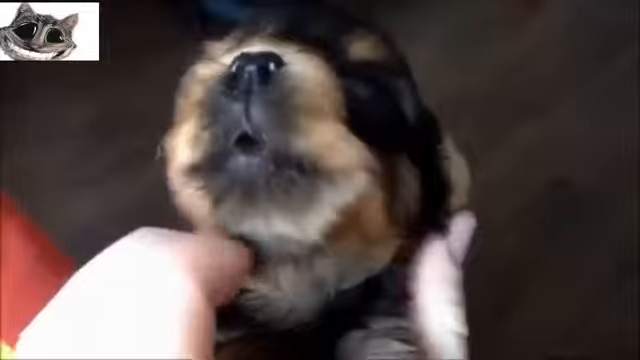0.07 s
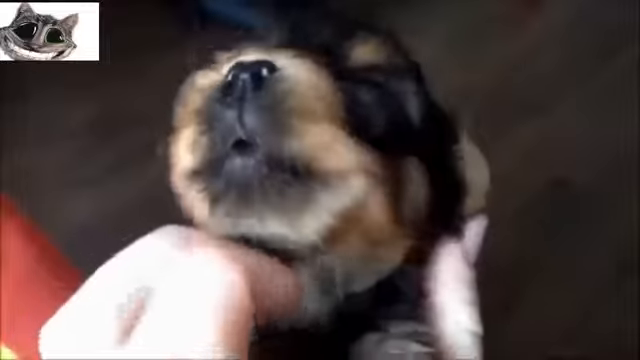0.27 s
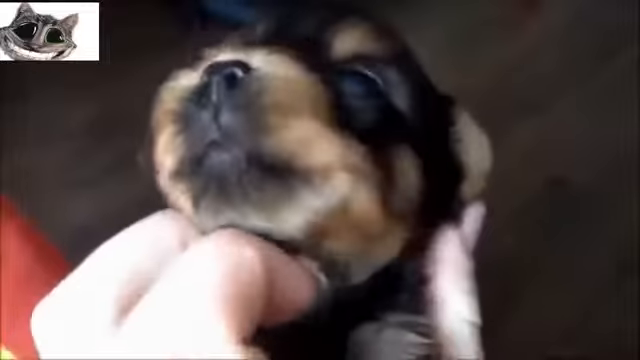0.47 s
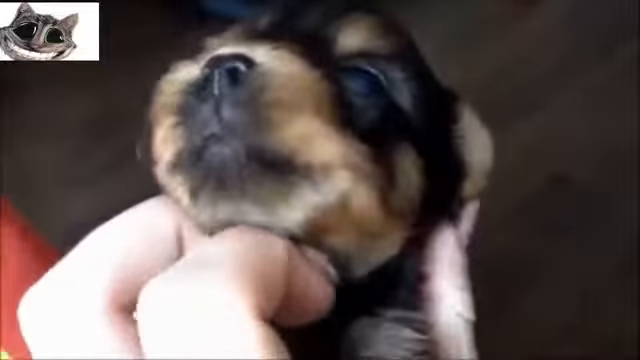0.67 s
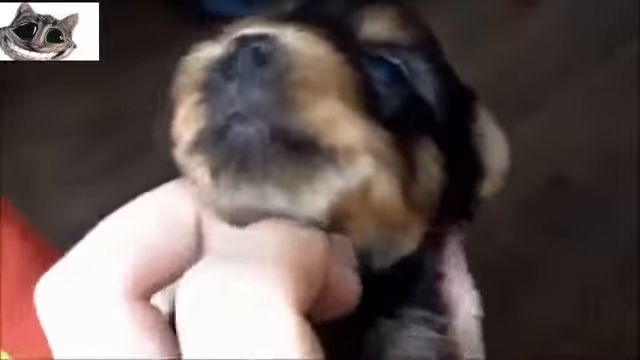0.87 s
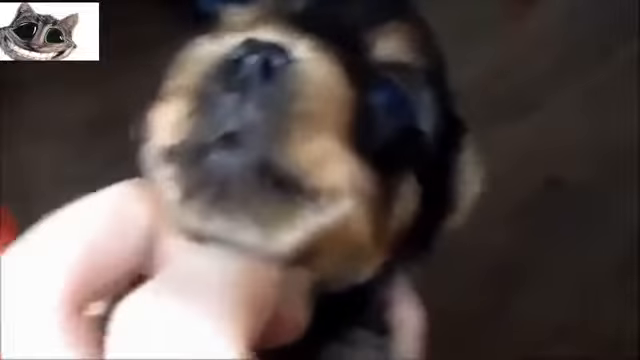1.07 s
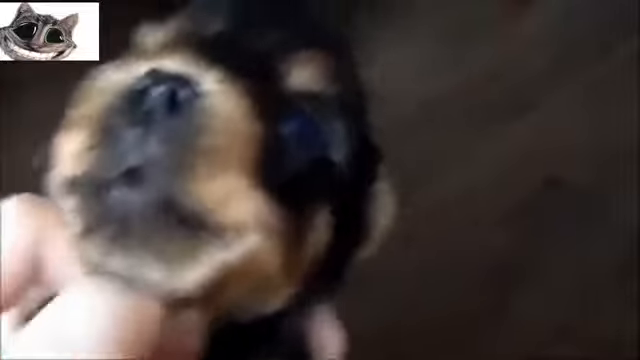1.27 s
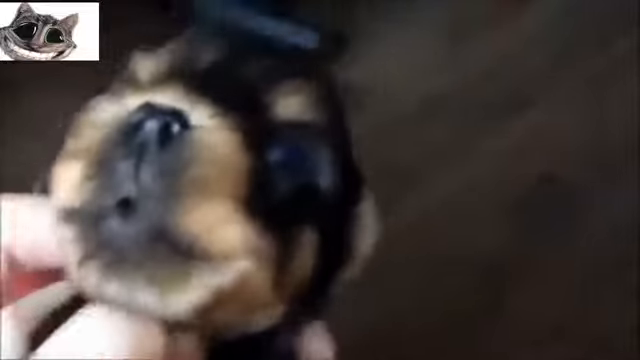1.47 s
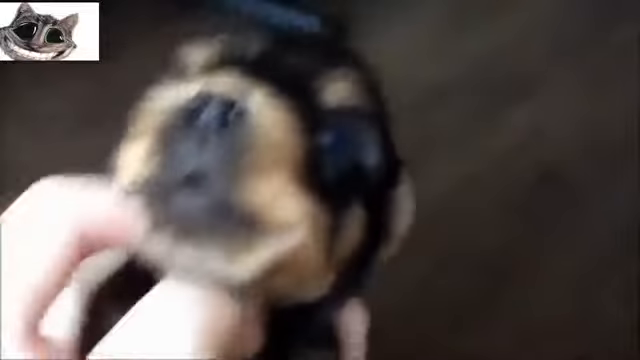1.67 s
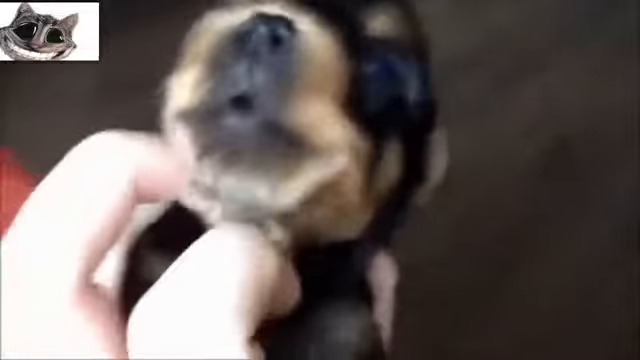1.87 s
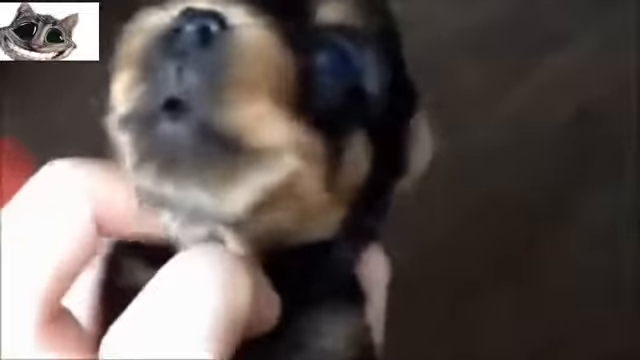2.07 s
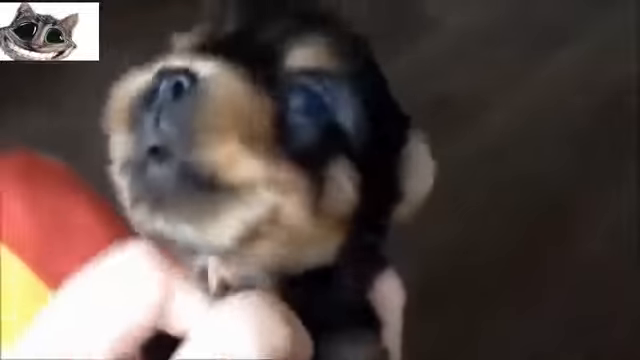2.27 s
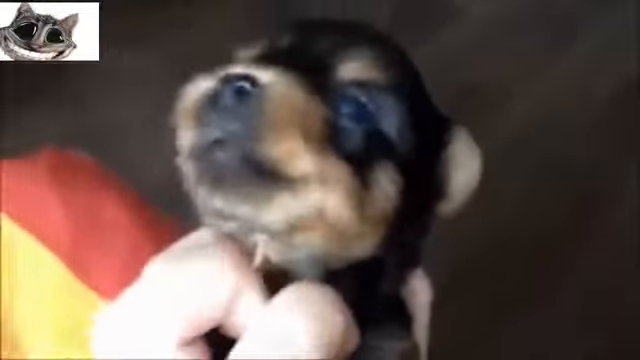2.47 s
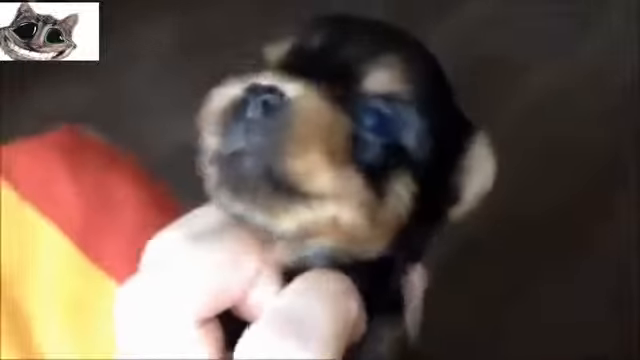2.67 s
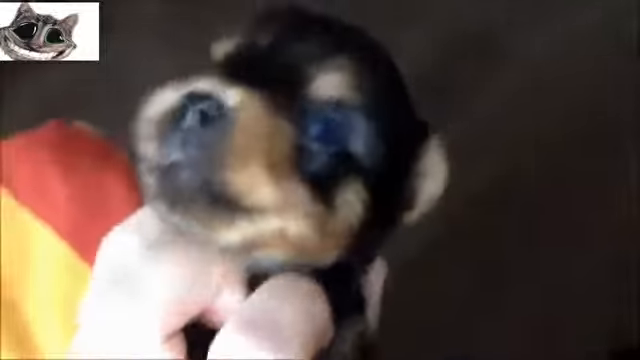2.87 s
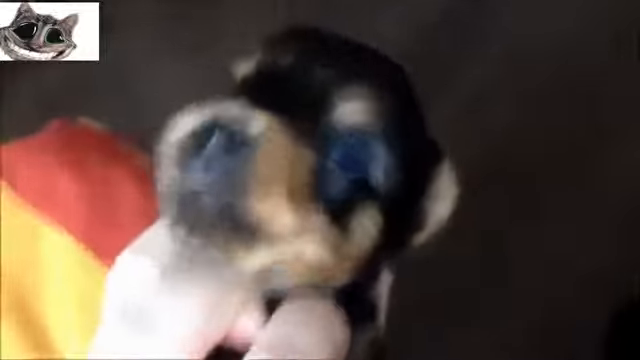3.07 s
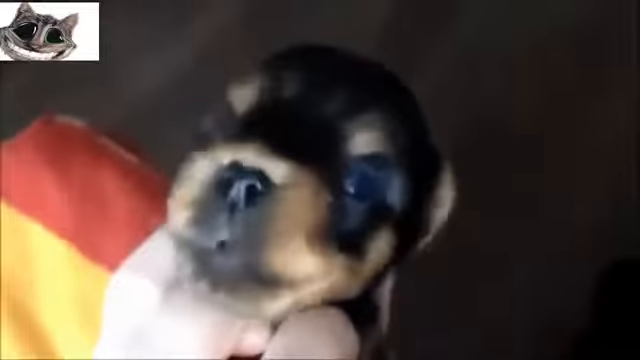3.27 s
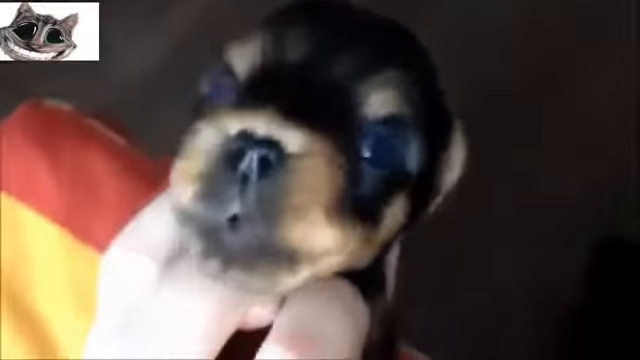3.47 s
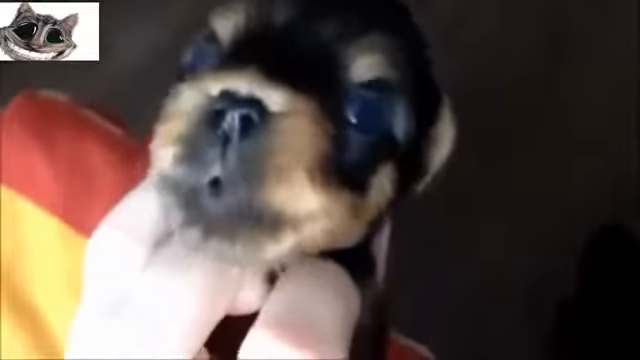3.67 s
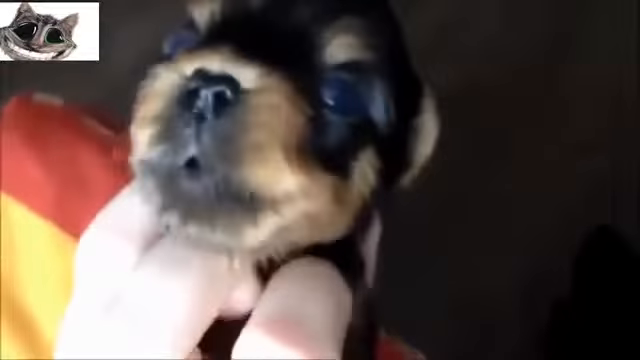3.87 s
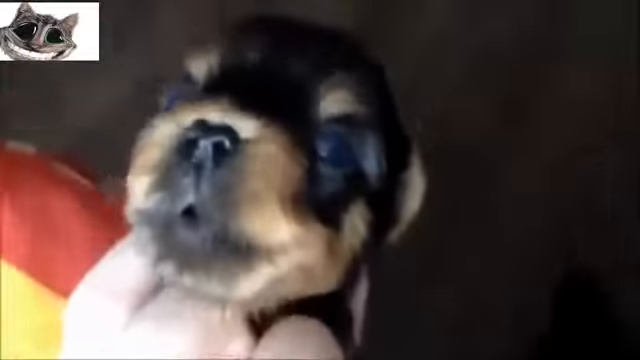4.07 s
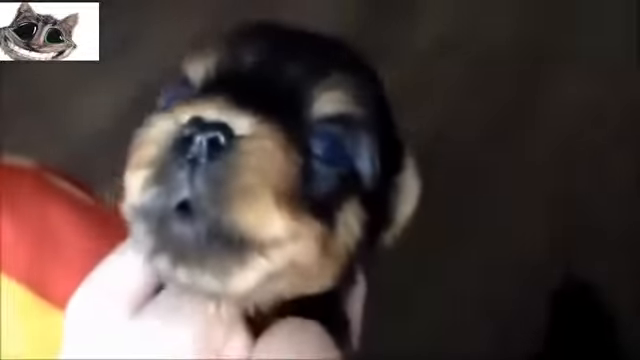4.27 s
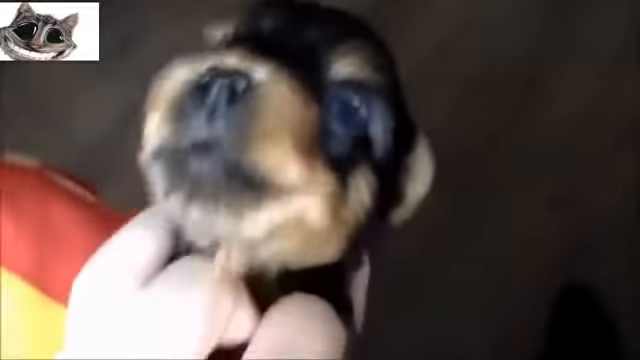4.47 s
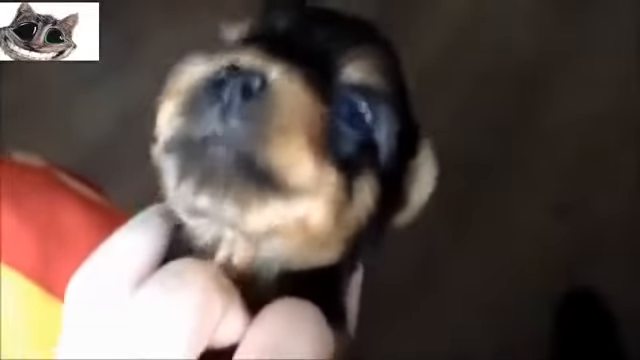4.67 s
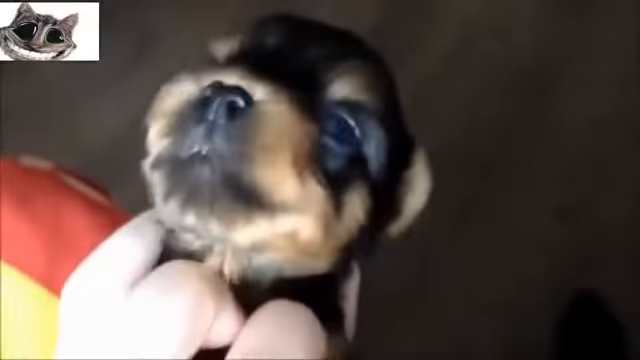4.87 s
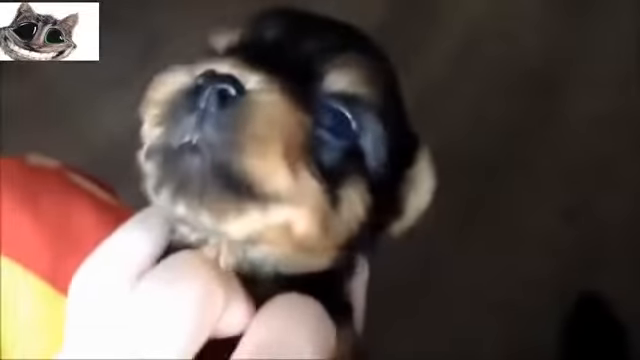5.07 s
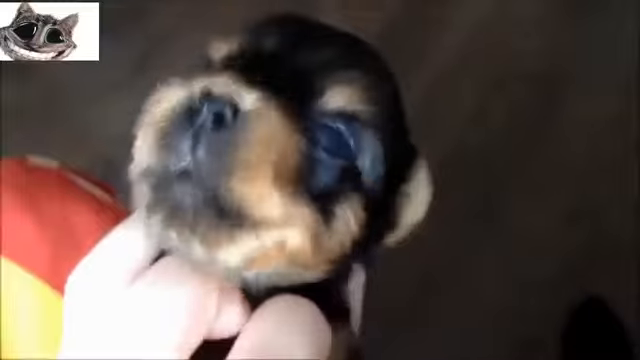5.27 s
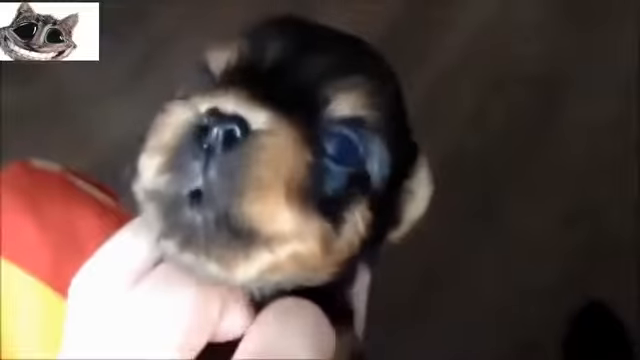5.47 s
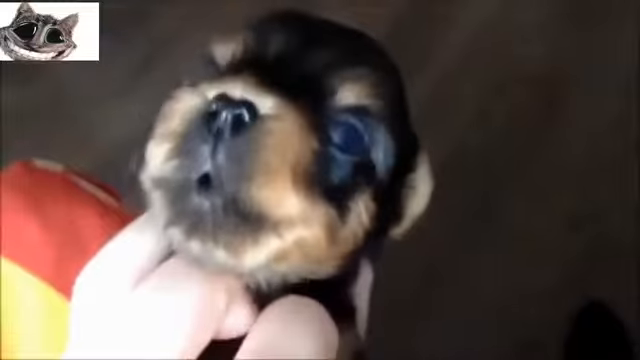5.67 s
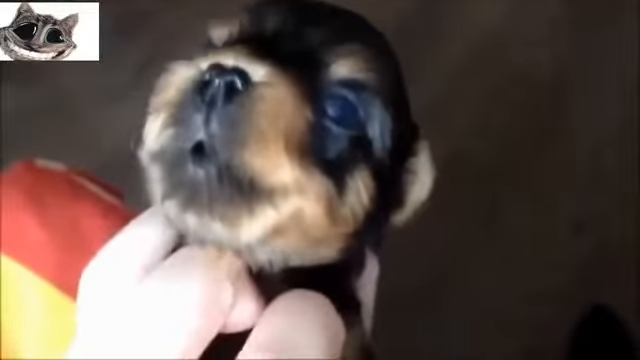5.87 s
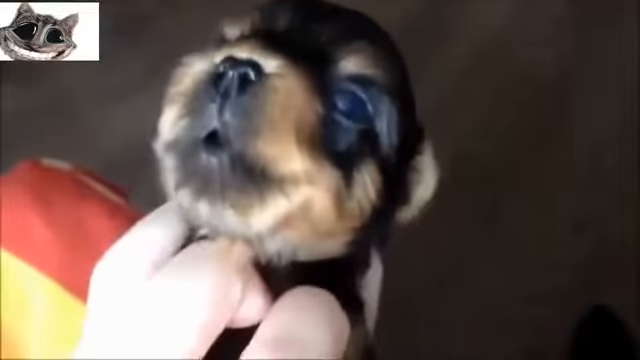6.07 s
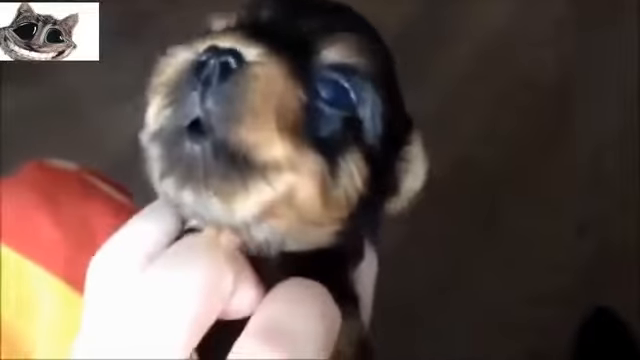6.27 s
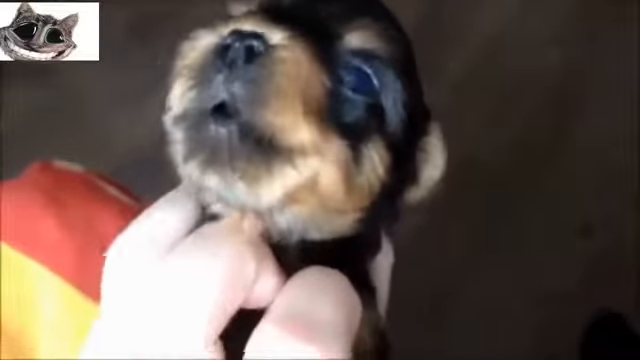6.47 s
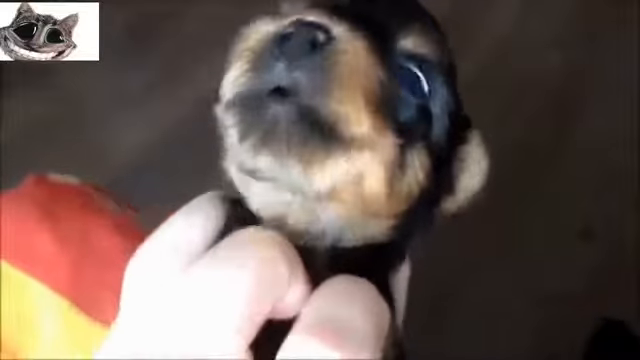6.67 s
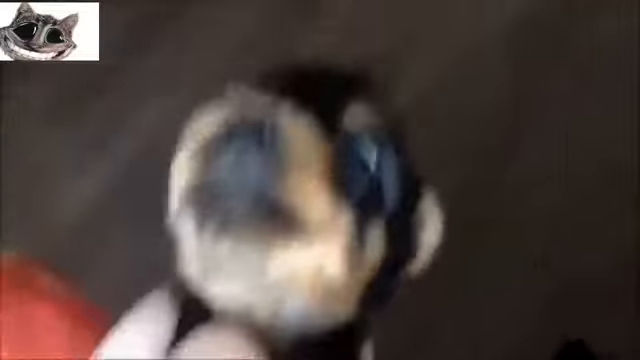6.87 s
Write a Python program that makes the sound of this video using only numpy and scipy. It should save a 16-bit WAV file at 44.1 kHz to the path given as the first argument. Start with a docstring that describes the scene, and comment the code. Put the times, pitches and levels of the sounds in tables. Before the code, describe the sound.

A tiny puppy gives high, thin, drawn-out howls that scoop up, tremble and sag, while fingers softly rub its fur in a quiet room.

```python
"""A quiet room hisses and rumbles (shaped noise) with a few unsteady appliance tones (wavering sines).
First comes the end of a very small puppy's howl; then fingers rubbing its chin stroke the fur (noise bursts).
Three more howls follow, with strokes and wet clicks (brief tone pulses): sums of sines on one gliding pitch,
which catch, scoop up, tremble, sag slowly and, like the first, flip up at the end.
Breath noise colours all four howls; a slower flutter in the throat adds sidebands to the last three."""
import sys
import numpy as np
from scipy import signal
from scipy.fft import rfft, irfft
from scipy.io import wavfile
from scipy.ndimage import uniform_filter1d

SR = 44100
rng = np.random.default_rng(int(sys.argv[2]) if len(sys.argv) > 2 else 0)


def store_pcm(level_fs):
    """Save levels as 16-bit WAV."""
    pcm = np.round(np.clip(level_fs, -1, 1) * 32767).astype(np.int16)
    wavfile.write(sys.argv[1], SR, np.atleast_2d(pcm).T)


N = 305613


def gain_of(db):
    """Logarithmic level: 20 dB is a factor of ten in amplitude."""
    return 10 ** (np.asarray(db) / 20)


def evened(x):
    """Normalization of effective value: scales to unit rms."""
    return x / np.sqrt(np.mean(x ** 2) + 1e-20)


def read(points, hz):
    """Interpolation of a spectrum along a logarithmic frequency axis."""
    f, value = np.transpose(points)
    return np.interp(np.log(hz + 1), np.log(f + 1), value)


def unroll(rows):
    """Linear interpolation of a curve table: sample times/s and the remaining columns."""
    s, *columns = np.transpose(rows)
    t = np.arange(max(s[0], 0), s[-1], 1 / SR)
    return t, [np.interp(t, s, c) for c in columns]


def add(mix, s, sound):
    """Superposition: adds a sound to the mix from s seconds on."""
    part = mix[round(s * SR):][:len(sound)]
    part += sound[:len(part)]


def drift(size, hz):
    """Low-pass random fluctuation of unit rms: two moving averages smooth what varies faster than hz."""
    span = max(int(SR / hz / 2), 1)
    smooth = uniform_filter1d(rng.standard_normal(size), span)
    return evened(uniform_filter1d(smooth, span))


def coloured(gain):
    """Spectral shaping: steady white noise filtered by the amplitude curve gain(hz), at unit rms."""
    hz = np.fft.rfftfreq(N, 1 / SR)
    spectrum = rfft(rng.standard_normal(N)) * gain(hz)
    return evened(irfft(spectrum, N))


def bell(hz, centre_hz, width):
    """Resonance curve of height 1, whose full width at half height is width."""
    return 1 / (1 + (2 * (hz - centre_hz) / width) ** 2)


def bump(t, s, rise, fall):
    """Asymmetric Gaussian envelope of height 1 at s, with standard deviations rise and fall."""
    return np.exp(-.5 * ((t - s) / np.where(t > s, fall, rise)) ** 2)


def background():
    """Stationary noise with a shaped spectrum, plus sines that wander in level and phase."""
    # spectral density of the room noise: f/Hz, relative level/dB
    room_tone = [(12, -53), (20, -17.5), (59, -21), (199, -1), (262, -6.5), (337, -7), (730, -14),
                 (990, -14.5), (1270, -16.5), (1380, -14), (2090, -21), (3740, -17.5), (9320, -24.5),
                 (12600, -23.5), (14900, -21)]
    # appliance tones: f/Hz, level/dB before a common lift of 4 dB
    hum_tones = [(204.6, -74.5), (328.4, -78), (436.0, -81), (985.1, -84.5), (1384, -80.5), (1421, -88.5),
                 (2848, -94.5), (3790, -83), (4377, -84)]
    room_db = -63.5  # rms
    t = np.arange(N) / SR
    hum = np.zeros(N)
    for hz, db in hum_tones:
        level = gain_of(db + 4 + 1.2 * drift(N, hz=5.4))
        cycles = hz * t + .3 * drift(N, hz=5.4)
        hum += level * np.sin(2 * np.pi * cycles)
    return gain_of(room_db) * coloured(lambda hz: gain_of(read(room_tone, hz))) + hum


def room(x):
    """Diffuse reverberation: dense random echoes, decaying exponentially and duller than the source."""
    decay_60db_s, gap_s = .28, .006
    t = np.arange(SR // 2) / SR
    echoes = rng.standard_normal(len(t)) * gain_of(-60 * t / decay_60db_s) * (t > gap_s)
    echoes = signal.lfilter([1], [1, -.8], echoes)  # low-pass
    return signal.fftconvolve(x, echoes / np.linalg.norm(echoes))[:N]


def hands():
    """Friction noise: scuff and hiss swell with each stroke in the fur, over a high rustle."""
    # spectral density of the dull scuff: f/Hz, relative level/dB
    scuff_spectrum = [(180, -29), (300, -14), (318, -47), (545, 1), (817, -13.5), (891, -21), (1000, -2.5),
                      (3000, -22.5), (3900, -52), (6600, -120)]
    # strokes of the fingers: t/s of the peak, rise/s, fall/s, dull scuff level/dB, fine hiss level/dB
    strokes = [(.49, 0.011, 0.062, -63, -73), (.77, 0.012, .05, -64.5, -76),
               (.874, 0.034, 0.045, -63.5, -79), (1.13, 0.013, 0.035, -66.5, -81),
               (1.21, 0.041, 0.034, -64, -91), (2.5, 0.0091, 0.036, -71, -74),
               (2.87, 0.068, 0.058, -70.5, -76.5), (3.03, 0.1, 0.06, -90, -66.5),
               (3.222, .01, 0.031, -82, -72), (4.66, .02, 0.049, -66.5, -82),
               (4.74, 0.019, 0.014, -67.5, -87), (4.895, 0.028, .006, -69, -71),
               (5.328, 0.022, .06, -67, -79)]
    # high rustle, perhaps moving hands and cloth: t/s, level/dB
    rustle_curve = [(0, -74), (.3, -68.5), (.5, -69.5), (.68, -88.5), (.8, -72), (1.2, -71.5),
                    (1.32, -63.5), (1.5, -77.5), (1.9, -68), (2.42, -66), (2.52, -79.5), (3.35, -85),
                    (3.45, -77.5), (4.4, -77.5), (5, -84), (5.5, -80.5), (5.58, -65), (5.7, -76),
                    (6.93, -71.5)]
    scuff = coloured(lambda hz: gain_of(read(scuff_spectrum, hz))) * gain_of(1.1 * drift(N, hz=39.0))
    hiss = coloured(lambda hz: bell(hz, 4800, 6000))
    rustle = coloured(lambda hz: bell(hz, 11800, 3500))
    t = np.arange(N) / SR
    rustle_db = np.interp(t, *np.transpose(rustle_curve)) + 1.2 * drift(N, hz=50.)
    out = gain_of(rustle_db) * rustle
    for s, rise, fall, scuff_db, hiss_db in strokes:
        out += bump(t, s, rise, fall) * (gain_of(scuff_db) * scuff + gain_of(hiss_db) * hiss)
    return out


def mouth_clicks():
    """Damped impulse response: each small wet click is a sine under a Gaussian envelope."""
    # clicks: t/s of the start, envelope peak level/dB, f/Hz
    click_rows = [(2.623, -44, 1844), (3.452, -36, 1900), (4.353, -37, 2227), (4.743, -44, 1430)]
    peak_s, spread_s = .0012, .00024
    out = np.zeros(N)
    t = np.arange(200) / SR
    for s, db, hz in click_rows:
        pulse = bump(t, peak_s, spread_s, spread_s) * np.sin(2 * np.pi * hz * t)
        add(out, s, gain_of(db) * pulse)
    return out


def throat_flutter(howl_phase):
    """Intermodulation: a second, slower vibration yields sums and differences with the howl's harmonics."""
    # one curve a spell: t/s, f/Hz, level/dB, rms unsteadiness/Hz
    spells = [
        [(1.27, 298, -63, 80), (1.33, 321, -55.5, 80), (1.365, 446, -48.5, 80), (1.42, 450, -75, 80)],
        [(3.449, 412, -38.5, 31), (3.48, 424.7, -45.5, 25), (3.55, 438, -50.5, 28), (3.575, 497.6, -48, 12.1),
         (3.75, 499, -49.5, 11), (3.95, 579, -46.5, 68), (4.12, 579.6, -53, 64), (4.325, 565, -53, 54),
         (4.347, 565, -41, 70), (4.365, 571, -66.5, 51), (4.5, 555, -77, 90)],
        [(5.55, 310, -56, 35), (5.6, 372.4, -46, 30), (5.645, 384, -50, 40), (5.68, 412.5, -71, 50.2),
         (5.83, 370, -66, 39.93), (6.15, 377, -68.5, 40.23), (6.4, 452, -78.5, 39.7)],
    ]
    # mixing products: harmonic of the howl, sign of the flutter, relative level/dB
    sidebands = [(0, 1, -15), (1, -1, -18), (1, 1, 0), (2, -1, -12), (2, 1, -19), (3, -1, -24)]
    out = np.zeros(N)
    for rows in spells:
        t, (hz, level_db, wobble_hz) = unroll(rows)
        phase = 2 * np.pi * np.cumsum(hz + wobble_hz * drift(len(t), hz=110.3)) / SR
        howl_part = howl_phase[round(t[0] * SR):][:len(t)]
        mixed = sum(gain_of(db) * np.cos(k * howl_part + sign * phase) for k, sign, db in sidebands)
        level = gain_of(level_db + 2.8 * drift(len(t), hz=30.))
        add(out, t[0], level * mixed * signal.windows.tukey(len(t), .02))
    return out


def breath():
    """Turbulence noise shaped by throat resonances; the leak comes in puffs."""
    # throat resonances: f/Hz, width/Hz (of the curve before squaring), relative level/dB
    throat = [(546, 250, -7.5), (1553, 260, 5.5), (1860, 370, -2.5), (2960, 160, -29), (4180, 1700, -12.5),
              (10970, 1800, -17)]
    air = coloured(lambda hz: sum(gain_of(db) * bell(hz, f, w) ** 2 for f, w, db in throat))
    return air * gain_of(2.8 * drift(N, hz=45.))


def throat_trembles():
    """Muscular modulation: pitch drop/% and level drop/dB that set in fast and let go more slowly."""
    # trembles and small swells: t/s, pitch drop/%, time scale/ms, level drop/dB
    trembles = [(1.314, 11.5, 9.3, 1), (1.357, 14, 10.2, 2.5), (1.408, 4.5, 10.3, -.8), (1.447, 5, 5.6, 0),
                (1.487, 1.5, 28.4, 0.6), (1.604, 0.2, 22, 2), (2.024, 2, 9.7, -1.5),
                (2.115, -0.7, 19, -0.5), (2.184, -0.9, 19, 2), (2.382, 0, 9.2, 3), (3.467, 9, 7.5, 0.5),
                (3.508, 9, 8.3, 1.5), (3.55, 7, 8.5, 1), (3.638, 3.5, 8.5, 1.7), (3.681, 2, 11.5, 2),
                (3.724, 4.5, 5.5, 3.5), (3.77, -1.4, 5.1, 1.5), (3.84, 0.4, 12, -2.5), (4.047, -0.3, 17, 1),
                (4.109, -0.5, 8.2, 2.5), (4.246, -0.5, 10.3, 0.5), (4.426, -1.1, 12.6, -0.5),
                (5.61, 11.5, 8.2, 0), (5.656, 14.2, 8.3, 3), (5.701, 11, 8, 0), (5.751, 6, 9.9, 0.8),
                (5.8, 3.5, 14.8, 2.5), (5.85, 4.5, 9, 0.7), (5.95, 0.87, 17, 2.5), (6.609, 1.7, 11.6, 1.5),
                (6.735, 4.5, 13.4, -0.7)]
    t = np.arange(N) / SR
    shapes = [bump(t, s, .75 * ms / 1000, 1.2 * ms / 1000) for s, _, ms, _ in trembles]
    return np.transpose(trembles)[[1, 3]] @ shapes


def howl(rows, traits, air, pitch_sag, level_sag):
    """Fourier synthesis of vibrating folds: harmonics of one gliding pitch, roughened, plus leaking air."""
    # the lower the pitch, the richer the tone: f/Hz, 2nd, 3rd, 4th harmonic level/dB re fundamental
    overtone_rows = [(700, 5.5, -2.5, -20), (797, 2, -16, -27), (1027, -5, -27, -31),
                     (1115, -7.5, -30.5, -42), (1130, -9, -30, -40.5), (1248, -11.5, -32, -43.5),
                     (1450, -13.5, -35.5, -46.5)]
    # how far the 2nd, 3rd, 4th and higher harmonics follow the pressure [dB/dB]
    pressure_shares = (1.01, 1.2, .4, .7)
    # 5th harmonic and up, through muzzle and nose: f/Hz, level/dB re fundamental, before other offsets
    muzzle = [(3500, -34), (4300, -38.5), (5100, -49), (5900, -54), (6500, -40), (7100, -42.5), (7800, -48),
              (8600, -55), (9600, -51), (10500, -43.5), (11600, -51.5), (12500, -64.5)]
    # unevenness of the folds' wave shape: harmonic number, level offset/dB
    orders = [(5, -2), (6, 0), (7, -14), (8, -12), (9, 2), (10, -10)]
    # the folds catch loud, then drop to the foot of the scoop
    attack_s, shut_s, catch_db = .0025, .0015, 12.5
    # pitch flips up as the breath is cut off
    flip_hz, flip_hold_s, flip_dull_db, release_s, release_db = 1408, .0036, -9, .0048, -10
    # hoarser just after the start and just before the end; louder is clearer
    raw_db, raw_s, cut_db, cut_s, clear_per_db = 12.5, .14, 7.5, .044, .4128
    # hoarseness (squared) and each % of tremble scatter the timing of the upper harmonics
    scatter_rad, tremble_scatter_rad = 90, .015

    catch_hz, catch_s, flip_s, *colour_db, hoarse_db = traits
    t, (hz, level_db, pressure_db, lift_db) = unroll(rows)
    size = len(t)
    at = round(t[0] * SR) + np.arange(size)
    pitch_sag, level_sag = pitch_sag[at], level_sag[at]
    since, left = t - rows[0][0], rows[-1][0] - t

    catch = np.exp(-since / catch_s)
    flip = np.exp(-np.maximum(left - flip_hold_s, 0) / flip_s)
    hz = hz + (catch_hz - hz) * catch + (flip_hz - hz) * flip
    level = gain_of(level_db + catch_db * catch + release_db * np.exp(-left / release_s))
    level = level * np.minimum(np.minimum(since / attack_s, left / shut_s), 1)

    pitches, *overtones = np.transpose(overtone_rows)
    base_db = [np.interp(hz, pitches, o) for o in overtones] + [0]
    second_db, third_db, fourth_db, bright_db = [
        base + db + share * pressure_db for base, db, share in zip(base_db, colour_db, pressure_shares)]

    edges_db = raw_db * np.exp(-since / raw_s) + cut_db * np.exp(-left / cut_s)
    hoarse = gain_of(hoarse_db - clear_per_db * (level_db - level_db.mean()) + edges_db)
    # hoarseness makes cycles uneven in length and size and lets air leak
    jitter = 0.0025 * drift(size, hz=30.0) + 0.22 * hoarse * drift(size, hz=403.0)
    hz = uniform_filter1d(hz, size=90) * np.exp(jitter - pitch_sag / 100)
    phase = 2 * np.pi * np.cumsum(hz) / SR
    rough_db = [np.minimum(40 * hoarse, 2.5) * drift(size, hz=119.0) + drift(size, hz=25.5)
                for _ in range(3)]
    # slack folds close harder, which feeds the 3rd and 4th harmonics; in the flip these fade first
    closing_db = .7 * pitch_sag + flip_dull_db * np.exp(-left / flip_s)

    # the phase of the 2nd harmonic makes one half of the wave deeper than the other
    tone = np.cos(phase) - gain_of(second_db + 0.51 * rough_db[0]) * np.cos(2 * phase - .6)
    scatter = np.minimum(scatter_rad * hoarse ** 2 + tremble_scatter_rad * abs(pitch_sag), .5)
    upper = phase + scatter * drift(size, hz=251.2)
    tone += gain_of(third_db + lift_db + 1.9 * rough_db[1] + closing_db) * np.cos(3 * upper)
    tone += gain_of(fourth_db + 0.18 * lift_db + 1.6 * rough_db[2] + closing_db) * np.sin(4 * upper)
    for k, db in orders:
        order_db = db + bright_db + read(muzzle, k * hz) + 1.3 * drift(size, hz=30.) + rough_db[2]
        tone += gain_of(order_db) * np.sin(k * upper)

    shimmer_db = 0.45 * drift(size, hz=25.0) + 8 * hoarse * drift(size, hz=202.0)
    sound = level * gain_of(shimmer_db - level_sag) * (np.sqrt(2) * tone + hoarse * air[at])
    return at, phase, sound


def puppy():
    """Superposition of the puppy's sources: four howls, the flutter coupled to them and mouth clicks."""
    # one curve a howl, the first already under way:
    # t/s, f/Hz, fundamental rms level/dB, pressure on the folds/dB, 3rd harmonic lift/dB
    howl_curves = [
        [(-.3, 950, -28.5, 13, -18), (.02, 889, -36.5, -1.5, -2), (.1, 875, -38, -2.5, -1.5),
         (.2, 899, -39, -4, 3), (.26, 946, -42.5, 0, 7), (.3, 1054, -42, -2.5, 10), (.331, 1050, -43.5, 7, 0)],
        [(1.2395, 612, -46.5, 0, 0), (1.252, 695, -38, -1, 3), (1.275, 803, -31.5, 0.5, 11.5),
         (1.3, 1094, -28.5, 9, 2), (1.34, 1275, -24.5, 6.5, -5), (1.4, 1220, -27, 1, -5),
         (1.46, 1268, -25, 4, -16), (1.52, 1317, -19.5, -1, 4), (1.58, 1298, -20, 0.5, -0.5),
         (1.7, 1273, -25, 3, -0.5), (1.85, 1182, -26.5, 3, -3.5), (2.0, 1129, -29.5, 3.5, 1.5),
         (2.15, 1045, -32.5, 3, 4.5), (2.3, 1006, -31.5, -3, -2), (2.41, 1055, -37.5, -4, 17),
         (2.466, 1160, -39, 1, 14)],
        [(3.3895, 795, -45.5, 0, 3), (3.402, 826, -38, -1, 7.5), (3.43, 1024, -28, 3, -6),
         (3.452, 1226, -25, -2, 1), (3.49, 1241, -27.1, -1, -7), (3.55, 1229, -30, -2, 3.5),
         (3.6, 1258, -28.7, -2.5, 9.5), (3.7, 1316, -28, 3.5, -1.5), (3.78, 1272, -30, 3, 2.5),
         (3.9, 1214, -28.5, -3, 2.5), (4.05, 1182, -30.5, 0, 5), (4.2, 1164, -30, -1, -3),
         (4.35, 1128, -29.5, -1.5, -1.5), (4.47, 1097, -33, -4, -8), (4.55, 1092, -34.5, -6, 2),
         (4.592, 1118, -42, -1, 7)],
        [(5.5055, 680, -46, -8, 0), (5.515, 694, -40, 4.5, -4), (5.535, 889, -36.5, 1, 1.5),
         (5.558, 1209, -23, -7.5, 9.5), (5.595, 1232, -26.5, -1.5, 0), (5.64, 1186, -30, 0, -2),
         (5.72, 1189, -30, 1.5, -4.5), (5.82, 1225, -27.5, 0, 1), (5.92, 1186, -29.5, 0.5, -0.5),
         (6.05, 1179, -30.5, 0, 1), (6.2, 1166, -29, -0.5, 0.5), (6.35, 1134, -30.5, 0.5, 0.5),
         (6.5, 1113, -32, -1.5, -0.5), (6.65, 1089, -31, -6, -20), (6.72, 1100, -36, -2.5, -2),
         (6.76, 1098, -42, -2.5, 3), (6.795, 1100, -41.5, -2, 15)],
    ]
    # one row a howl: catch f/Hz, catch time/s, flip time/s, 2nd, 3rd, 4th harmonic offset/dB,
    # brightness/dB, hoarseness/dB
    howl_traits = [(900, .003, 0.011, -0.82, 3.5, 2, 7, -33.5),
                   (882, .003, 0.0086, -3.5, -7, -3.1, 0, -36.5),
                   (1507, 0.0035, 0.007, -0.26, 1, -1, -3.5, -34),
                   (1207, 0.0042, 0.0098, 1.1, 4, 1.5, -0.5, -38)]
    voice, howl_phase = np.zeros(N), np.zeros(N)
    pitch_sag, level_sag = throat_trembles()
    air = breath()
    for rows, traits in zip(howl_curves, howl_traits):
        at, phase, sound = howl(rows, traits, air, pitch_sag, level_sag)
        howl_phase[at], voice[at] = phase, sound
    return voice + throat_flutter(howl_phase) + mouth_clicks()


def scene():
    """Mid-side stereo: one common signal feeds both channels; only a faint part differs between them."""
    voice = puppy()
    mid = voice + gain_of(-22.5) * room(voice) + hands() + background()
    side = gain_of(-23) * (background() + hands()) + gain_of(-36.5) * room(voice)
    return np.array([mid + side, mid - side])


def record(dry):
    """Quadratic distortion and low cut of the microphone, then the band limit of the recorder."""
    edge_hz = 14990
    bent = dry + 0.066 * dry ** 2
    thin = signal.lfilter([1, -1], [1, -.997], bent)
    low_pass = signal.firwin(2047, edge_hz, window=("kaiser", 9), fs=SR)
    return signal.oaconvolve(thin, low_pass[None], "same")


dry = scene()
out = record(dry)
store_pcm(out)
```